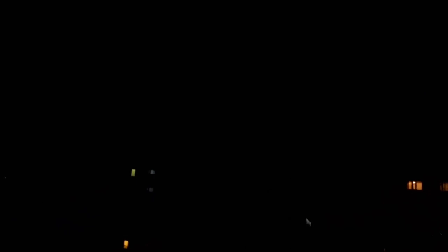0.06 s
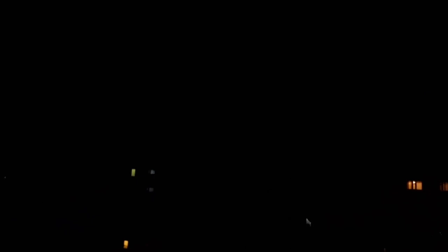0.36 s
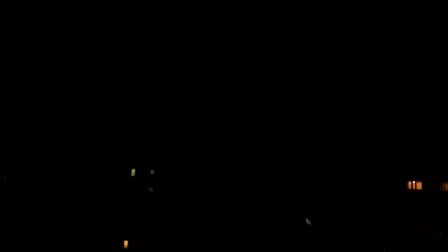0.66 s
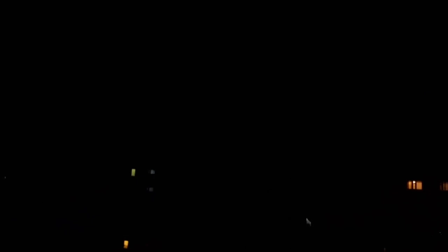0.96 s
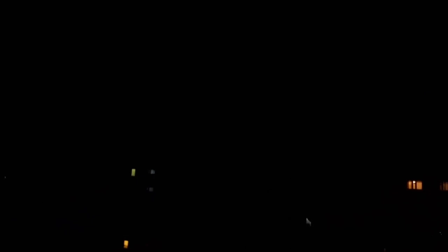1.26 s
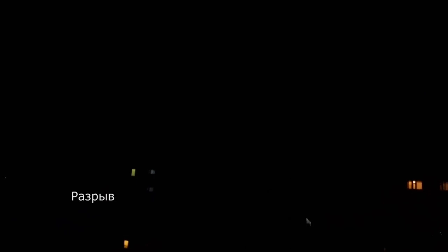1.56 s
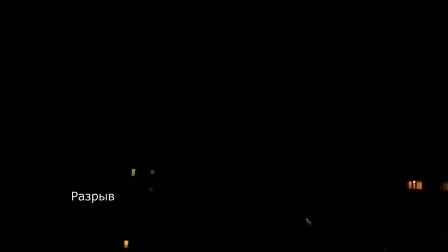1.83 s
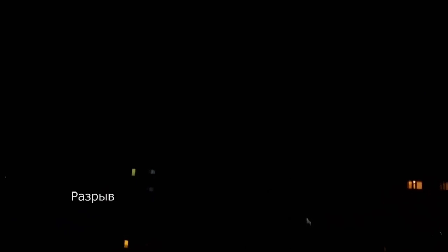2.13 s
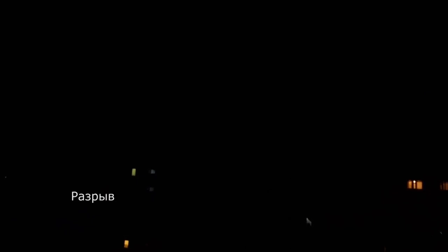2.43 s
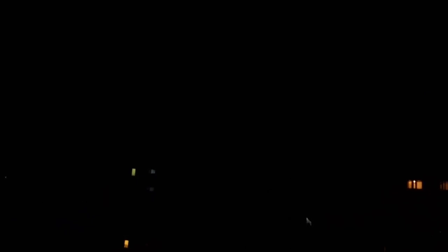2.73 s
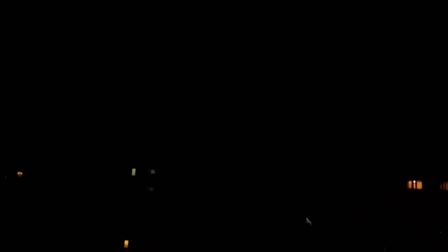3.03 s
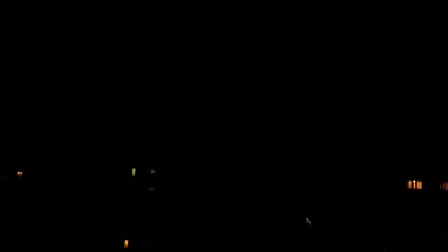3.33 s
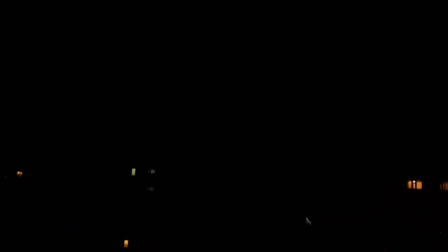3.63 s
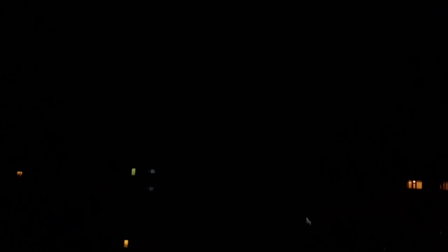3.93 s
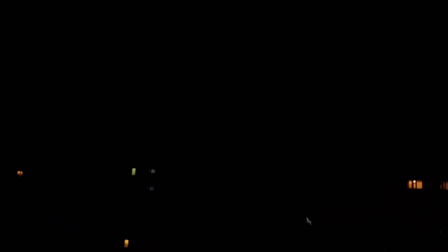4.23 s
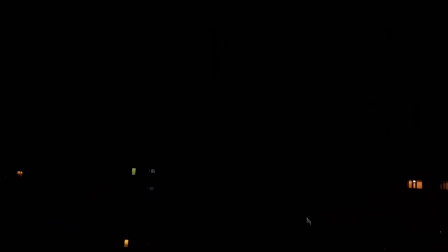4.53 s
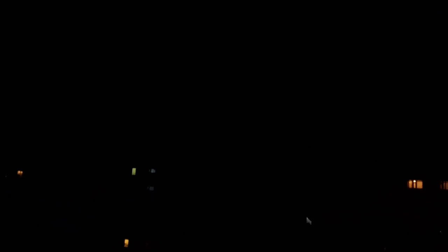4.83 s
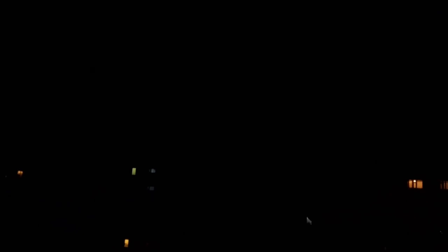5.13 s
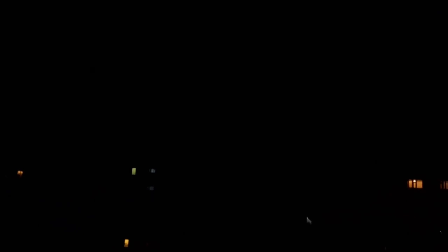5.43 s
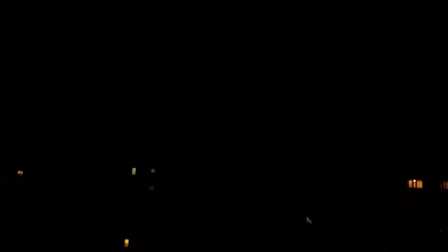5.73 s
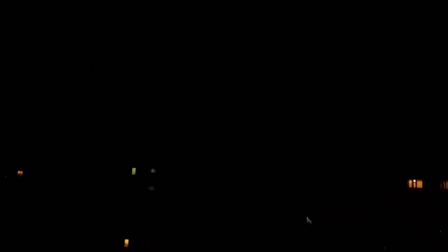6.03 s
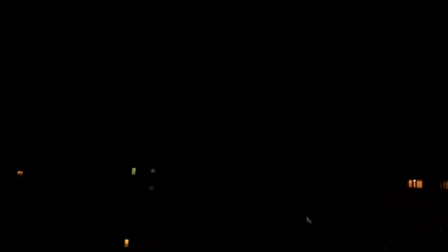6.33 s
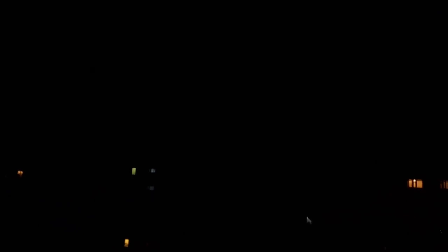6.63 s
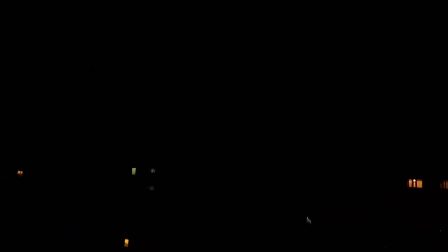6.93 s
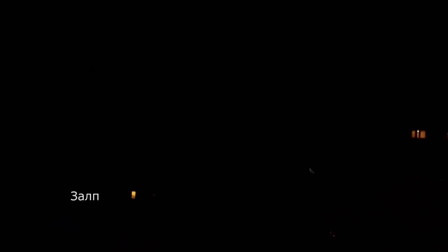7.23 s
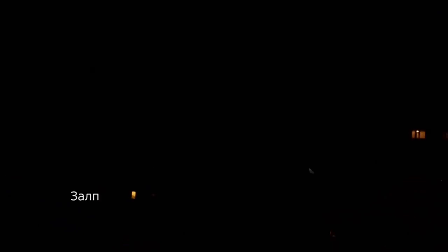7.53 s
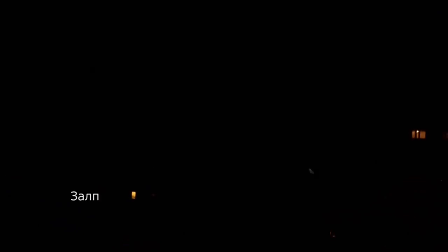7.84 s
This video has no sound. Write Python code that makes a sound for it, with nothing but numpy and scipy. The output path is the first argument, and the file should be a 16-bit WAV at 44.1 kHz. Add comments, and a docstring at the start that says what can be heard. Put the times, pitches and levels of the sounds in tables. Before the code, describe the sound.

Distant artillery over a town at night is heard from inside a room. A small motor hums faintly throughout, with a low town murmur, thin hiss and a very soft whirring tick about once a second. Faint, dull thuds come in the first 1.3 seconds, and a far dog gives one short, barely audible falling howl at about 1.2 seconds. At 1.55 seconds a shell bursts in a loud, rapid cluster of booms, peaking around 1.9 seconds, where the microphone overloads and crackles. Hard echoes slap back at about 2.3 and 3 seconds. The rumble rolls on like thunder, ever duller and quieter, dying away around 6.6 seconds. A soft thud follows at 6.9 seconds. At 7.3 seconds a gun fires with a deep, dull double thump, quieter than the burst, and its low echoes fade through the end at about 8 seconds.

```python
"""Artillery over a town at night, heard from a room where a motor hums and something ticks faintly
about once a second. First come faint thuds and one far dog's howl. At 1.55 s a shell bursts: its
shock fronts (sudden jumps in air pressure) overload the microphone, which crackles. The echoes roll
away for five seconds, ever duller. After one more thud, a gun fires at 7.3 s with a deep double
thump and echoes of its own."""
import sys
import numpy as np
from scipy import signal
from scipy.io import wavfile
from scipy.ndimage import uniform_filter1d, minimum_filter1d

SR = 44100
rng = np.random.default_rng(int(sys.argv[2]) if len(sys.argv) > 2 else 0)


def unload_audio(sound):
    """Save the sound as a 16-bit wav file, at the path given as the first command line argument."""
    columns = np.transpose(np.atleast_2d(sound))
    # keep every value between -1 and 1, then stretch to whole-number steps
    steps = np.round(np.clip(columns, -1, 1) * 32767)
    wavfile.write(sys.argv[1], SR, steps.astype(np.int16))


N = 351918
TIME = np.arange(N) / SR
BURST_S = 1.553
# The deep tone of gun echoes and rumbles. Each row: frequency in Hz, strength in dB.
DEEP_COLOUR = [(25, -31.5), (70, 3.5), (118, -9), (177, 1), (202, -17.5), (249, -8.5), (289, -15.5),
               (374, -22.5), (500, -33.5), (1200, -70.5), (1560, -106)]


def shell_fronts(strays_per_s=19, span_s=4, fade_db_per_s=9.5, bounce_s=0.00452, bounce_db=-9.5):
    """The shell's shock fronts arrive, then ever fainter stray ones; each bounces off a nearby surface."""
    # The burst and its strongest reflections. Each row: start in seconds, level in dB, length in ms.
    strong = [(1.5538, 0, 1.77), (1.602, -1.5, 2.7), (1.620, -2.5, 4.8), (1.632, 4, 1.52), (1.651, 1, 1.86),
              (1.6755, -0.5, 5.1), (1.7425, -8, 6.3), (1.792, -5, 2.2), (1.861, 3.5, 3.2),
              (1.871, 3.5, 2.8), (1.8975, 4, 3.9), (1.9115, 3, 4.4), (1.926, -4, 11), (2.272, -10.5, 2.3),
              (2.326, -2, 5.6), (2.559, -12, 4.3), (2.995, -15.5, 3.2), (3.016, -14.5, 3.3),
              (3.053, -13, 3), (3.109, -17.5, 4.5), (3.382, -27, 2.8), (3.733, -34, 1.8), (4.977, -31, 5.8)]
    strays = []
    for when, size, length in rng.random((int(strays_per_s * span_s), 3)):
        delay_s = span_s * when
        db = -11 - fade_db_per_s * delay_s + 7 * (2 * size - 1)
        strays.append((BURST_S + delay_s, db, 2.6 * (.5 + length)))
    direct = list(strong) + strays
    bounced = [(s + bounce_s, db + bounce_db, length_ms) for s, db, length_ms in direct]
    return fronts(direct + bounced, air_hz=876, lag_ms=0.29, low_cut_hz=71, order=6)


def shell_roll(air_db_per_khz_s=5.0, clear_below_hz=690, end_s=6.58, end_db_per_s=24.5):
    """The burst echoes like thunder; later echoes have crossed more air and lost more treble."""
    # Echo groups, each off one stretch of houses or hills.
    # Each row: start in seconds, length in seconds, level in dB, extra treble in dB.
    echoes = [(1.547, 0.034, -16.5, 2), (1.598, 0.1, -10, -1.5), (1.721, 0.11, -13.5, -0.5),
              (1.788, 0.058, -9.5, 1), (1.851, 0.057, -6, -2), (1.926, 0.047, -13, -1),
              (2.03, 0.028, -33.5, 8), (2.246, 0.12, -19, 6.5), (2.489, 0.19, -19.5, -1),
              (3.012, 0.12, -23, -6.5), (3.282, 0.22, -27, -10.5), (4.238, 0.21, -32.5, -13.5),
              (4.564, 0.46, -34.5, -8)]
    # Slow, deep pressure swells. Each row: start in seconds, length in seconds, level in dB.
    heaves = [(1.672, 0.079, -0.5), (1.905, 0.18, -4), (2.55, 0.059, -27.5)]
    # The tone of all these echoes. Each row: frequency in Hz, strength in dB.
    colour = [(25, -13.5), (39, 2.5), (50, -7.5), (78, -11), (124, 1.5), (210, -1), (330, -3.5),
              (600, -8.5), (1000, -20.5), (1280, -20), (1581, -26.5), (1992, -40), (2510, -51.5),
              (4000, -79)]
    # The smooth roll between the groups. Each row: frequency in Hz, starting level in dB.
    roll_start = [(60, -19), (200, -15.5), (500, -11.5)]
    # How fast that roll fades. Each row: frequency in Hz, dB lost per second.
    roll_fade = [(60, 6.84), (200, 5.5), (500, 9.23)]
    middle = echo_groups([(s, length, db) for s, length, db, bright in echoes], BURST_S)
    treble = echo_groups([(s, length, db + bright) for s, length, db, bright in echoes], BURST_S)
    bass = echo_groups(heaves, BURST_S) + middle * from_db(-14) ** 2
    age = np.maximum(TIME - BURST_S, 0)
    grain_db = 0.5 * drift(170)   # single echoes stand out in the upper bands
    out = 0
    for hz, band in bands(colour):
        low = at_hz([(65, 0.53), (115, 0.015)], hz)
        high = at_hz([(260, 0), (480, 0.89)], hz)
        groups = bass ** low * treble ** high * middle ** (1 - low - high)
        roll = blurred_echoes(BURST_S, at_hz(roll_start, hz), at_hz(roll_fade, hz), build_s=0.5)
        absorbed_db = air_db_per_khz_s * age * max(hz - clear_below_hz, 0) / 1000
        out = out + band * np.sqrt(groups + roll) * from_db(high * grain_db - absorbed_db)
    onset = np.clip(age / .003, 0, 1) ** 2
    return out * onset * from_db(-end_db_per_s * np.maximum(TIME - end_s, 0))


def overload_crackles(ragged_db=1.0):
    """Short, ragged crackles of the microphone overloading at the loudest peaks."""
    # Each row: start in seconds, level in dB, time in ms to fade by 60 dB.
    crackles = [(1.6769, -30.5, 16), (1.8412, -26, 5.8), (1.8503, -31, 6), (1.8622, -27.5, 14),
                (1.8711, -21, 47), (1.877, -24.5, 16), (1.9034, -22, 8.8), (1.9076, -21, 7.8)]
    # Their tone. Each row: frequency in Hz, strength in dB.
    colour = [(1500, 13.5), (2500, 4.5), (4500, -6), (7000, -27.5), (15000, -43)]
    loudness = 0
    for s, db, fade_ms in crackles:
        lost_db = 60 * np.minimum(np.abs(TIME - s) * 1000 / fade_ms, 3)
        loudness = loudness + (TIME > s) * from_db(db - lost_db)
    return loudness * from_db(ragged_db * drift(700)) * noise(colour)


def claps(low_hz=1190, high_hz=1800):
    """Hard house fronts throw the burst back as bright claps."""
    # Each row: start in seconds, length in seconds, level in dB.
    clusters = [(1.81, 0.138, -37.5), (2.0, 0.039, -35), (2.053, .012, -33), (2.305, 0.046, -38.5)]
    bright = cut(rng.standard_normal((2, N)), (low_hz, high_hz), "band")
    return fade_in_out(clusters, edge_s=0.0077) * unit_level(bright)


def sizzle(fade_s=2.18):
    """A bright wash rings on after the hardest fronts, losing 60 dB in fade_s."""
    # Each row: start in seconds, level in dB.
    starts = [(1.681, -49), (1.869, -40)]
    # Its tone. Each row: frequency in Hz, strength in dB.
    colour = [(1800, 11.5), (2600, 1), (4000, -5.5), (5500, -11.5), (7500, -17), (9000, -38), (15000, -18)]
    power = sum((TIME > s) * from_db(db - 60 * np.abs(TIME - s) / fade_s) ** 2 for s, db in starts)
    return np.sqrt(power) * noise(colour)


def gun(snap_db=-27):
    """A dull blast leaves the barrel with a little snap at first; low, scattered echoes follow."""
    # The blast and its reflections. Each row: start in seconds, level in dB, length in ms.
    blasts = [(7.277, -2, 3.96), (7.283, -3.5, 13), (7.289, -6, 3.6), (7.2962, -6.5, 11.3),
              (7.374, -7, 4.5), (7.382, -17, 13.4), (7.425, -16.5, 7.1), (7.6274, -17, 4.4),
              (7.666, -19.5, 12.6)]
    # Echo groups. Each row: start in seconds, length in seconds, level in dB.
    groups = [(7.30, .14, -22.5), (7.625, 0.061, -22), (7.948, 0.017, -26)]
    shot_s, first_echo_s = blasts[0][0], groups[0][0]
    roll = blurred_echoes(shot_s, db=-25.5, fade_db_per_s=16, build_s=0.018)
    echoes = noise(DEEP_COLOUR) * np.sqrt(echo_groups(groups, shot_s) + roll)
    direct = [row for row in blasts if row[0] < first_echo_s]
    snap = from_db(snap_db) * fronts(direct, air_hz=800, lag_ms=0, rise=.16, order=2)
    return fronts(blasts, air_hz=354, lag_ms=0.097, rise=0.19) + snap + echoes


def room(sound):
    """Waves standing between the walls lift some pitches and weaken others, differently on each side."""
    # Each row: frequency in Hz, width in Hz, change on the left in dB, change on the right in dB.
    resonances = [(173.5, 25, -6.5, -2.5), (222, 24, 0.5, 2), (273.5, 37, -4.5, -2.5), (378, 57, -4, -6),
                  (486, 47, 3, 0), (866, 130, -4.5, -3), (1120, 55, -0.5, 0), (1390, 220, -5, -4.5),
                  (1510, 62, 6.5, 5), (1740, 150, -1.5, -6), (2010, 100, 7.5, 1)]
    for hz, width, left_db, right_db in resonances:
        ringing = signal.lfilter(*signal.iirpeak(hz, hz / width, fs=SR), sound)
        sound = sound + (from_db([[left_db], [right_db]]) - 1) * ringing
    return sound


def far_thuds():
    """Fronts from much farther off arrive faint and dull."""
    # Each row: start in seconds, level in dB, length in ms.
    thuds = [(.022, -35.5, 5.7), (.378, -33, 12.5), (.612, -26, 3.8), (1.262, -32, 7.6), (6.93, -14, 0.96)]
    return fronts(thuds, air_hz=210, lag_ms=0.13, low_cut_hz=58)


def dog(blur_hz=70):
    """One falling howl; only its lowest tone carries this far, blurred by taking many paths."""
    # Each row: time in seconds, pitch in Hz, level in dB.
    howl = [(1.16, 700, -68), (1.205, 714, -51), (1.245, 661, -57), (1.285, 633, -54), (1.335, 594, -55),
            (1.38, 594, -78)]
    hz, db = in_time(howl)
    phase = 2 * np.pi * np.cumsum(hz) / SR
    paths = [drift(blur_hz) * np.sin(phase) + drift(blur_hz) * np.cos(phase) for side in range(2)]
    return from_db(db) * np.array(paths) * (TIME > howl[0][0]) * (TIME < howl[-1][0])


def rumbles_and_moans(moan_hz=262, edge_s=.03):
    """The town's bass swells around two of the thuds, and a soft tone wells up twice."""
    # Each row of both: start in seconds, length in seconds, level in dB.
    rumbles = [(.33, 0.039, -52), (1.2, .07, -47)]
    moans = [(.69, 0.1, -55), (1.21, 0.147, -54.5)]
    tone = np.sqrt(2) * np.sin(2 * np.pi * moan_hz * TIME)
    return fade_in_out(rumbles, edge_s) * noise(DEEP_COLOUR) + fade_in_out(moans, edge_s) * tone


def motor_hum(turns_per_s=49, waver_db=1.5, flutter_db=2.4, wander=.0015):
    """A small motor's tones and a few others waver; standing waves make them differ left and right."""
    # Each row: multiple of the turning rate, level in dB, left minus right in dB, likeness of the sides.
    harmonics = [(1, -59, 0, 0.94), (2, -57.5, 1, 1), (4, -63, 3, .94), (7, -72, 2, .7),
                 (9, -69.5, -0.5, .56), (10, -58.5, -1, 0.87), (11, -70, -1, 1)]
    # Other tones in the room. Each row: frequency in Hz, then the same three columns.
    other_tones = [(257, -63.5, 2, .94), (1327, -83.5, 3.5, 1), (1577, -67, -3, -0.73)]
    motor_tones = [(multiple * turns_per_s, *rest) for multiple, *rest in harmonics]
    out = 0
    for hz, db, lean_db, alike in motor_tones + list(other_tones):
        phase = 2 * np.pi * np.cumsum(hz * (1 + wander * drift(6.7))) / SR
        apart = np.arccos(alike)
        level_db = db + waver_db * drift(25) + flutter_db * drift(25)
        out = out + np.sqrt(2) * from_db(level_db) * lean(lean_db) * np.sin([phase - apart, phase])
    return out


def whine():
    """Narrow bands of noise make the top of the hum flutter."""
    # Each row: frequency in Hz, width in Hz, level in dB.
    peaks = [(1521, 60, -72.5), (2340, 55, -89), (2950, 90, -90.5), (3780, 120, -93.5)]
    white = rng.standard_normal((2, N))
    return sum(from_db(db) * unit_level(cut(white, [hz - width / 2, hz + width / 2], "band", order=1))
               for hz, width, db in peaks)


def ticks(rise_s=0.015, hold_s=.055, fade_s=0.34, top_hz=5600):
    """A soft, brief whirr comes about once a second."""
    # Each row: start in seconds, level in dB.
    starts = [(0.406, -71), (1.403, -69), (3.405, -70), (4.407, -68), (5.405, -65.5), (6.405, -70.5),
              (7.44, -69)]
    # Its tone. Each row: frequency in Hz, strength in dB.
    colour = [(1600, 0.5), (2400, -4), (3100, -18.5), (4600, -1.5), (5300, -9)]
    loudness = 0
    for s, db in starts:
        lost_db = 60 * np.clip((TIME - s - hold_s) / fade_s, 0, 2)
        loudness = loudness + np.clip((TIME - s) / rise_s, 0, 1) * from_db(db - lost_db)
    return cut(noise(colour), top_hz, "low", order=8) * loudness


def night(murmur_db=-52.5):
    """The town murmurs, most restless in the bass, under a thin, wavering hiss."""
    # The tones of murmur and hiss. Each row of both: frequency in Hz, strength in dB.
    town_colour = [(25, -32), (45, -11), (60, -10), (105, -2), (160, -5.5), (220, -7.5), (300, -10.5),
                   (400, -16.5), (650, -20.5), (850, -32), (1150, -32.5), (1450, -35.5), (1900, -52)]
    hiss_colour = [(1800, 3.5), (3000, -4), (5000, -6), (8000, -12.5), (10500, -13.5), (13000, -0.5),
                   (15500, 3.5)]
    # The hiss over time. Each row: time in seconds, level in dB.
    hiss_levels = [(0, -73.5), (1.5, -72.5), (2.7, -80.5), (4, -72), (4.9, -69.5), (6, -72.5)]
    stir = 0.5 * drift(27)
    town = sum(band * from_db(murmur_db + stir * at_hz([(200, 0.66), (450, 0.21)], hz))
               for hz, band in bands(town_colour))
    return town + from_db(in_time(hiss_levels)[0]) * noise(hiss_colour)


def fronts(rows, air_hz, lag_ms, low_cut_hz=25, rise=0.083, order=4):
    """Pressure jumps, sinks and jumps back like the letter N; air dulls it, and the left gets it later."""
    out = np.zeros(N)
    for s, db, length_ms in rows:
        progress = np.linspace(0, 1, max(int(length_ms * SR / 1000), 2))
        wave = np.interp(progress, [0, rise, 1 - rise, 1], [0, 1, -1, 0])
        at = int(s * SR)
        out[at:at + len(wave)] += from_db(db) * wave[:max(N - at, 0)]
    out = cut(cut(out, air_hz, "low", order=order), low_cut_hz, "high")
    return np.array([np.interp(TIME - lag_ms / 1000, TIME, out), out])


def echo_groups(rows, shot_s, smear_per_s=0.94):
    """The power of echo groups that swell, hold and fall, with softer edges the farther they have come."""
    power = 0
    for s, length, db in rows:
        smear = 1 + smear_per_s * max(s - shot_s, 0)
        rise = np.clip((TIME - s) / (0.004 * smear), 0, 1)
        fall = np.exp(-np.clip((TIME - s - length) / (0.015 * smear), 0, 20))
        power = power + rise * (from_db(db) * fall) ** 2
    return power


def blurred_echoes(shot_s, db, fade_db_per_s, build_s):
    """The power of countless reflections that build up after a shot, then fade evenly."""
    age = np.maximum(TIME - shot_s, 0)
    return np.clip(age / build_s, 0, 1) * from_db(db - fade_db_per_s * age) ** 2


def fade_in_out(rows, edge_s):
    """The loudness of short sounds that fade in, hold and fade out."""
    return sum(from_db(db) * np.clip(np.minimum(TIME - s, s + length - TIME) / edge_s + 1, 0, 1)
               for s, length, db in rows)


def bands(colour):
    """Stereo noise in slices a third of an octave wide; the two sides are most alike in the bass."""
    # Each row: frequency in Hz, likeness of the sides (1 is the same, -1 is opposite).
    likeness = [(60, 0.96), (130, 1), (280, 0.84), (480, 0.35), (700, 0.3), (1200, -0.52), (2500, 0.097),
                (15000, -0.17)]
    # Each row: frequency in Hz, left minus right in dB.
    balance = [(130, 0), (260, 1.9), (520, -2.5), (1100, -0.3), (2200, 3.5), (4400, -4.5), (8000, 1.5)]
    edges = 22 * 2 ** (np.arange(30) / 3)
    centres = np.sqrt(edges[1:] * edges[:-1])
    inside = (centres > colour[0][0] / np.sqrt(2)) & (centres < colour[-1][0] * np.sqrt(2))
    gains = from_db(at_hz(colour, centres)) * np.sqrt(np.diff(edges)) * inside
    gains = gains / np.linalg.norm(gains)
    white = rng.standard_normal((2, 2, N))
    for k in np.flatnonzero(inside):
        mid, side = unit_level(cut(white[k % 2], edges[k:k + 2], "band", order=3))
        alike = at_hz(likeness, centres[k])
        pair = np.sqrt((1 + alike) / 2) * mid + np.sqrt((1 - alike) / 2) * side * [[1], [-1]]
        yield centres[k], gains[k] * pair * lean(at_hz(balance, centres[k]))


def noise(colour):
    """Stereo noise with the given mix of low and high frequencies."""
    return sum(band for hz, band in bands(colour))


def drift(rate):
    """A random wobble that heads for a new value `rate` times a second."""
    knots = rng.standard_normal(2000)
    return np.interp(TIME * rate, np.arange(len(knots)), knots)


def cut(x, hz, kind, order=2):
    """Keep the lows, the highs or one band."""
    return signal.sosfilt(signal.butter(order, hz, kind, fs=SR, output="sos"), x)


def at_hz(points, hz):
    """Read a curve at a frequency, with octaves evenly spaced."""
    frequencies, values = np.transpose(points)
    return np.interp(np.log(hz), np.log(frequencies), values)


def in_time(rows):
    """Read each column of a curve at every sample."""
    s, *columns = np.transpose(rows)
    return [np.interp(TIME, s, column) for column in columns]


def lean(db):
    """Two gains that make the left louder than the right by `db`."""
    return from_db([[db / 2], [-db / 2]])


def from_db(db):
    """Turn decibels into a multiplier."""
    return 10 ** (np.asarray(db) / 20)


def unit_level(x):
    """Scale a sound to an average power of 1."""
    return x / np.sqrt(np.mean(x ** 2) + 1e-20)


def scene():
    """The booms come in through the room; the whole mix leans a little to the right."""
    booms = room(shell_roll() + claps() + overload_crackles() + sizzle() + gun() + shell_fronts())
    background = motor_hum() + whine() + ticks() + dog() + night() + far_thuds() + rumbles_and_moans()
    return (booms + background) * lean(-1.6)


def record(dry, top_hz=15800):
    """A fast limiter turns down peaks that overload, any excess is clipped, and the top treble is cut."""
    span = int(.004 * SR)
    needed_gain = 1 / np.maximum(np.abs(dry), 1)
    gain = uniform_filter1d(minimum_filter1d(needed_gain, span), span)
    treble_cut = signal.ellip(10, .1, 80, top_hz, fs=SR, output="sos")
    return signal.sosfilt(treble_cut, np.clip(dry * gain, -1, 1))


dry = scene()
out = record(dry)
unload_audio(out)
```